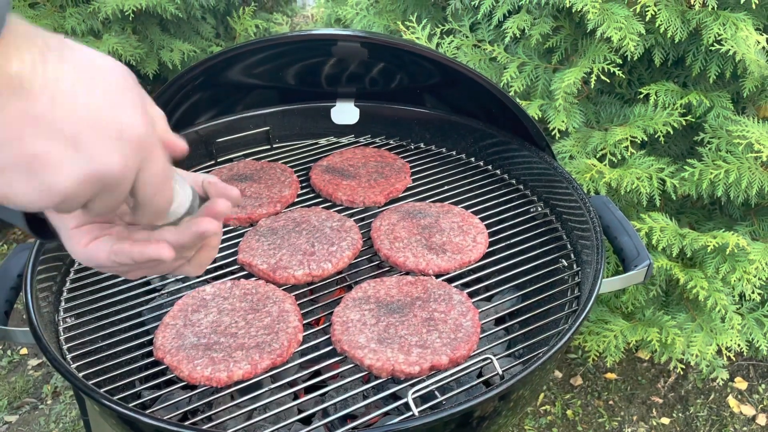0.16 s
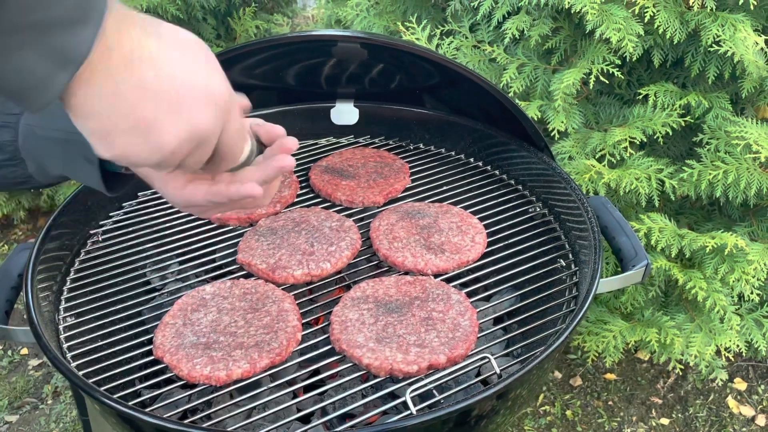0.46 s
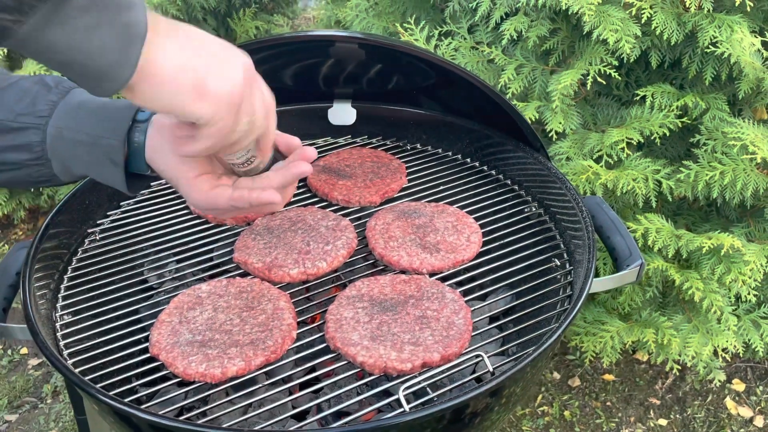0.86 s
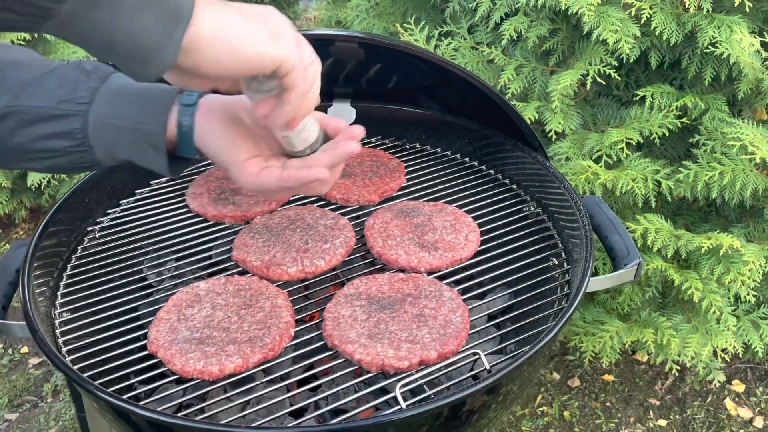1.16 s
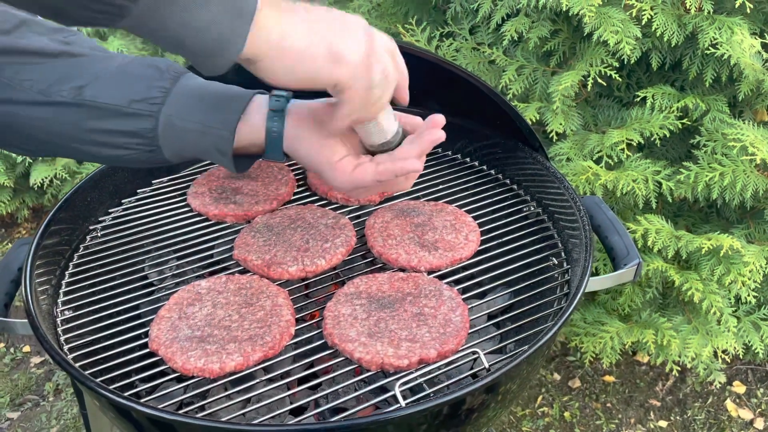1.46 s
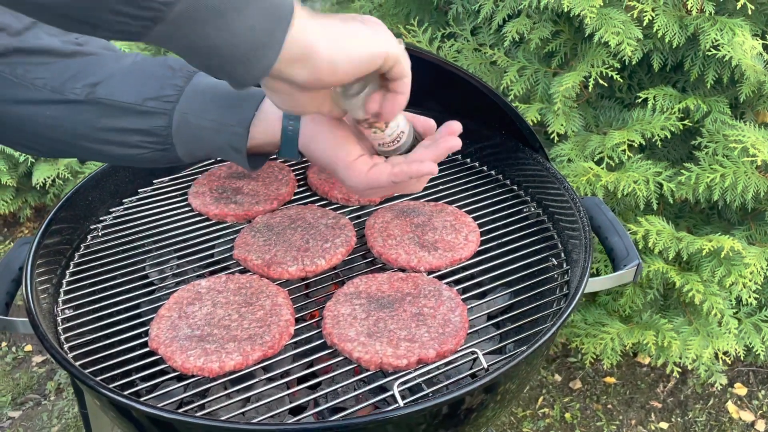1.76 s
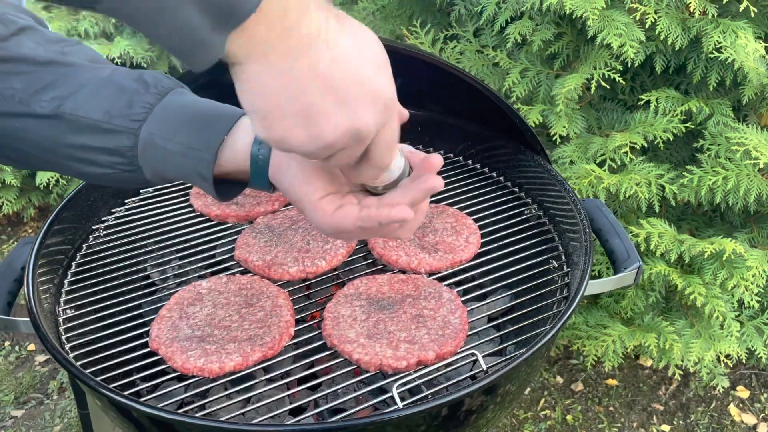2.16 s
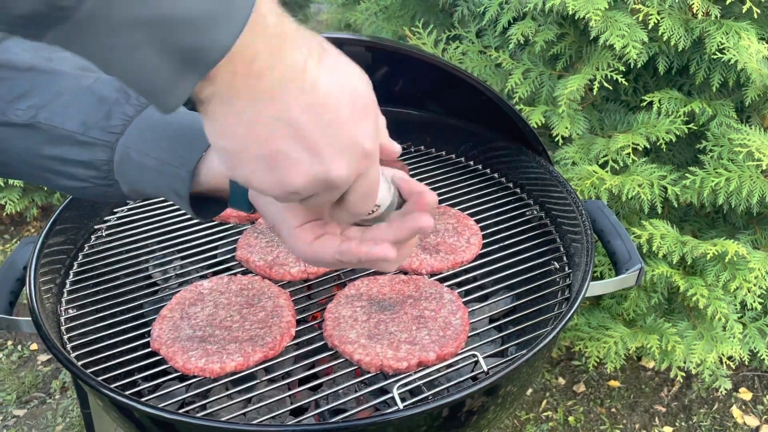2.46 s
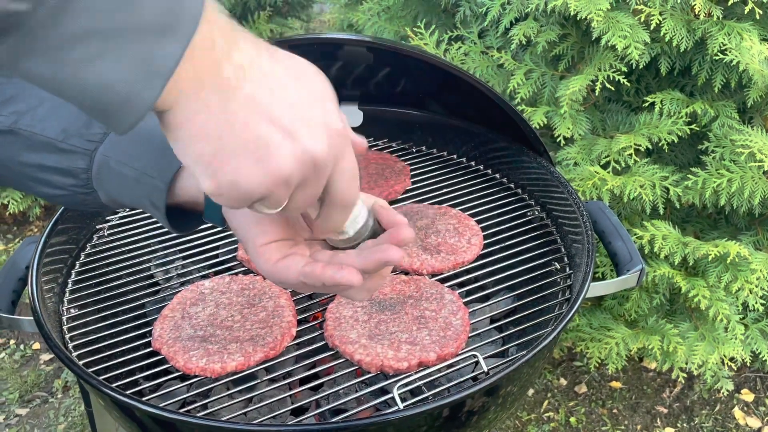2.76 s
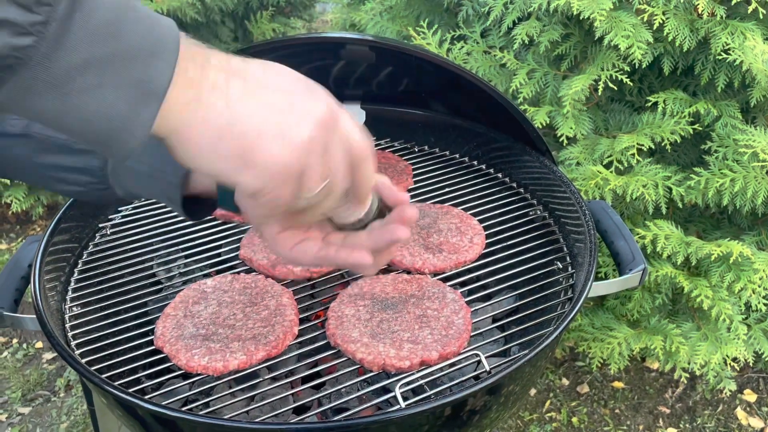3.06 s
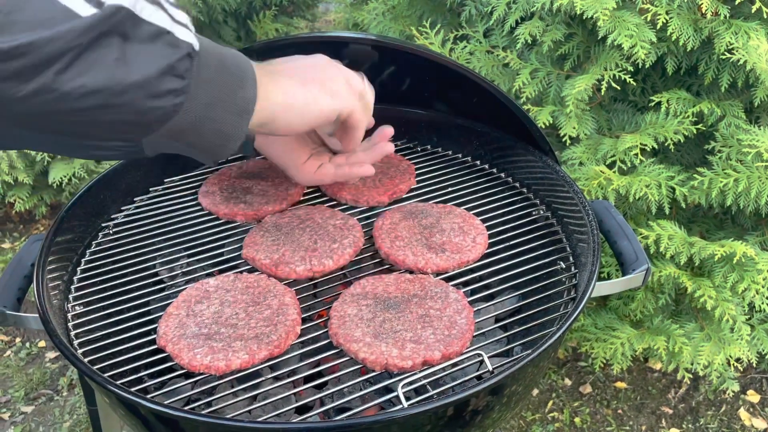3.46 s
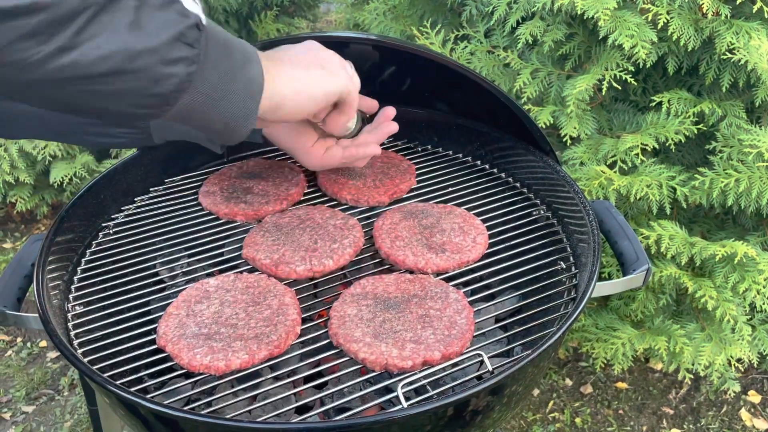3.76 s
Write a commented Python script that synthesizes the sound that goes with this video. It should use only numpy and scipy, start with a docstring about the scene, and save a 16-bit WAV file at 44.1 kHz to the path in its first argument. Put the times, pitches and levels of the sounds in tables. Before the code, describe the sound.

A small pepper mill is twisted by hand fourteen times, about every 0.3 seconds, each a brief dry crunch with sharp peppercorn snaps; outdoors over an open grill, close phone microphones, faint steady hiss beneath.

```python
"""Outdoors at an open kettle grill: a hand pepper mill is twisted fourteen times over it, close to a phone.
Each twist is a dense run of tiny grit fractures, and whole peppercorns snap as noise bursts around it;
both ring the mill's body and the cupped hands, and hard knocks add a low thud.
Hands and grill bowl scatter the sound to two microphones as decaying noise reflections.
A faint hiss and an outdoor rumble, both filtered noise, lie under it; the hardest snaps clip."""
import sys
import numpy as np
from scipy import signal
from scipy.fft import rfft, irfft
from scipy.io import wavfile
from scipy.ndimage import uniform_filter1d

SR = 44100
rng = np.random.default_rng(int(sys.argv[2]) if len(sys.argv) > 2 else 0)


def master_out(mix):
    """Clip the mix to full scale and print it as 16-bit PCM to the path in sys.argv[1]."""
    frames = np.transpose(np.atleast_2d(mix))
    ceiling = np.clip(frames, -1, 1)
    pcm = np.round(ceiling * 32767).astype(np.int16)
    wavfile.write(sys.argv[1], SR, pcm)


N = 171990

# Steady hiss around the grill. Each row: frequency in Hz, level in dB per Hz.
HISS = [(200, -10), (500, -17), (1400, -2.5), (2400, -0.5), (3300, -4.5), (5400, -4), (8000, -1),
        (13600, 5.5), (15700, 1)]
# Outdoor rumble. Each row: frequency in Hz, level in dB per Hz.
RUMBLE = [(28, -32.5), (52, 8), (70, -3), (250, -28.5)]
# Twists of the mill. Each row: start in seconds, end in seconds, crunch level in dB and
# low rasp level in dB (both before trim), resonance of the cupped hands in Hz.
TWISTS = [(0.123, 0.175, -17.5, -23.5, 560), (0.432, 0.489, -19.5, -23.5, 704),
          (0.713, 0.764, -13.5, -22.5, 222), (0.964, 1.032, -19.5, -24, 940),
          (1.281, 1.356, -21, -28, 1500), (1.575, 1.633, -20.5, -26.5, 1620),
          (1.822, 1.887, -21, -26, 1530), (2.122, 2.193, -16.5, -24, 1760), (2.395, 2.466, -18, -22, 644),
          (2.672, 2.706, -13.5, -24, 1400), (2.908, 2.973, -15.5, -27.5, 2300),
          (3.253, 3.333, -19, -28, 2400), (3.551, 3.629, -16, -27.5, 2180),
          (3.813, 3.867, -18.5, -24.5, 227)]
# Peppercorns that crack. Each row: start in seconds, snap level in dB, knock level in dB.
CRACKS = [(0.1285, -10, -24), (0.1425, -5, -11), (0.1519, -8, -17), (0.1649, -8, -21), (0.1875, -3, -7),
          (0.195, -10, -21), (0.4361, -7, -28), (0.4592, -7, -23), (0.4935, -11, -29), (0.709, -10, -26),
          (0.7145, -8, -26), (0.742, -3, -13), (0.7515, -5, -20), (0.7612, -7, -24), (0.9724, -9, -28),
          (0.9872, -6, -26), (1.0313, -8, -29), (1.0901, -20, -38), (1.2834, -5, -22), (1.5593, -16, -23),
          (1.5814, -5, -23), (1.5934, -6, -22), (1.607, -7, -18), (1.8096, -19, -34), (1.8403, -7, -24),
          (1.856, -7, -25), (2.002, -22, -40), (2.1004, -18, -37), (2.1222, -5, -18), (2.1302, -8, -17),
          (2.1383, -7, -14), (2.1744, -4, -15), (2.1921, -8, -23), (2.2463, -19, -42), (2.3782, -15, -20),
          (2.3949, -6, -25), (2.401, -5, -25), (2.4157, -3, -18), (2.431, -6, -16), (2.4638, -4, -21),
          (2.6324, -19, -43), (2.6609, -10, -25), (2.67, -7, -17), (2.675, -5, -25), (2.6935, -6, -21),
          (2.7245, -20, -20), (2.9024, -15, -31), (2.9168, -6, -22), (2.9258, -6, -29), (2.9445, -7, -18),
          (2.9724, -9, -25), (3.0418, -22, -41), (3.244, -10, -30), (3.2585, -4, -19), (3.3482, -9, -32),
          (3.536, -11, -23), (3.5553, -4, -20), (3.583, -3, -24), (3.597, -3, -25), (3.8165, -10, -24),
          (3.8858, -3, -21)]
# Low resonances of the jolted hands and mill. Each row: frequency in Hz, level in dB.
THUD = [(240, -11), (530, -3.5), (860, -2)]
# Colour of the breaking pepper. Each row: frequency in Hz, level in dB per Hz.
CRUNCH = [(1800, -32), (2900, -22), (4000, -7), (5300, -13), (6500, -5), (7900, 3.5), (11500, -6),
          (13400, 3), (15700, -9)]
# Colour of the mill's shell. Each row: frequency in Hz, level in dB per Hz.
SHELL = [(60, -36), (215, -3), (340, -15), (500, -11), (1000, -6), (1600, -2), (2400, 1.5), (2900, -8),
         (3700, -2.5), (5500, -26)]
# Ringing modes of the mill. Each row: frequency in Hz, 60 dB decay time in seconds, level in dB.
MODES = [(1570, 0.087, -18.5), (6450, 0.05, -21.5), (7060, 0.048, -24)]
# Colour of scattered sound. Each row: frequency in Hz, level in dB.
SCATTER = [(400, -6), (5500, 3), (8600, -5), (11300, 2), (13200, -11)]
# Phase lead of the left microphone over the right. Each row: frequency in Hz, lead in radians.
PORT_PHASE = [(1500, .4), (2300, 1.5), (3600, 5.8), (5200, 7), (6200, 4.9), (6700, 5), (7500, 3.6),
              (10000, 2.5), (12600, 0)]
# Level balance of the microphones. Each row: frequency in Hz, left minus right in dB.
PORT_BALANCE = [(800, 4), (2300, -3), (3200, 1), (6500, 3), (7700, 0)]

HISS_DB, RUMBLE_DB = -33.5, -50.5
HISS_WAVER_DB, RUMBLE_WAVER_DB, WAVER_PER_S = 0.6, 2.2, 7
RUMBLE_OWN_SHARE = 0.79  # noise of each side's own, relative to the common noise

TWIST_ATTACK_S, TWIST_RELEASE_S = 0.0016, 0.0045
TWIST_START_DB = -0.5  # each twist starts this much down and swells to its full level
SCRAPE_S, SCRAPE_DB = 0.014, -11.5  # light scraping before the burrs bite and after they let go
CRUNCH_TRIM_DB, RASP_TRIM_DB = -0.3, -1
CLUMP_PER_S, CLUMP_DB = 220, 1.5  # random unevenness of the grinding
GRIT_PER_S, GRIT_SPREAD_DB, GRIT_CYCLES = 2200, 3.2, 1.3
CHIP_LOW_HZ, CHIP_HIGH_HZ = 3580, 14140  # range in which the fragments ring

CRACK_S = 0.007  # length of a crack at full force, before its fall
SNAP_RISE_S, SNAP_FALL_S, KNOCK_FALL_S = 0.00015, 0.0009, 0.0018
THUD_T60_S = 0.035
HOLLOW_REF_HZ, HOLLOW_DB, HOLLOW_Q = 500, 1.5, 2.2  # the level holds at the reference pitch

SCATTER_T60_S, SCATTER_DB = 0.009, -5
BOWL_T60_S, BOWL_DB = 0.07, -17
CLIP_LEVEL, TOP_HZ = 1.0, 15750


def undb(db):
    """Decibels to gain."""
    return 10 ** (np.asarray(db) / 20)


def unit(x):
    """Scale to an rms of one."""
    return x / np.sqrt(np.mean(x ** 2) + 1e-18)


def curve(points, size):
    """Read (Hz, value) points at the bins of a transform, straight lines over log frequency."""
    hz, value = np.array(points, float).T
    bins_hz = np.fft.rfftfreq(size, 1 / SR) + 1  # the 1 avoids log(0)
    return np.interp(np.log(bins_hz), np.log(hz), value)


def through(x, response):
    """Pass a sound through an impulse response scaled to unit energy."""
    energy = np.sum(response ** 2)
    return signal.fftconvolve(x, response / np.sqrt(energy))[:N]


def colour(x, points, size=4096):
    """Shape the spectrum with a causal, minimum-phase filter of unit energy."""
    cepstrum = irfft(np.log(undb(curve(points, size))))
    # folding the cepstrum onto positive times makes the filter minimum phase
    cepstrum[1:size // 2] *= 2
    cepstrum[size // 2 + 1:] = 0
    return through(x, irfft(np.exp(rfft(cepstrum))))


def fade(t60):
    """Times and envelope of a decay by 60 dB."""
    t = np.arange(int(t60 * SR) + 2) / SR
    return t, 1000 ** (-t / t60)


def gate(t, length, rise, fall):
    """Linear attack, hold until the given length, exponential release."""
    attack = np.clip(t / rise, 0, 1)
    release = np.exp(-np.maximum(t - length, 0) / fall)
    return attack * release


def add(out, start, sound):
    """Mix a sound in at a time in seconds."""
    i = max(int(start * SR), 0)
    out[i:i + len(sound)] += sound[:max(N - i, 0)]


def walk(per_s):
    """Smooth random wander with an rms of one: held random steps, averaged over a step's length."""
    hold = max(int(SR / per_s), 1)
    steps = rng.standard_normal(N)[np.arange(N) // hold]
    return unit(uniform_filter1d(steps, hold))


def ports(x):
    """Direct sound reaches the two microphones with different phase and level, split evenly between them."""
    half = undb(curve(PORT_BALANCE, N) / 2) * np.exp(0.5j * curve(PORT_PHASE, N))
    spectrum = rfft(x)
    return np.array([irfft(spectrum * half, N), irfft(spectrum / half, N)])


def hiss():
    """Slightly wavering noise, partly from the direction of the mill and partly from all around."""
    ahead, left, right = (colour(rng.standard_normal(N), HISS) for _ in range(3))
    around = undb(SCATTER_DB) * np.array([colour(left, SCATTER), colour(right, SCATTER)])
    level = undb(HISS_DB + HISS_WAVER_DB * walk(WAVER_PER_S))
    return level * (ports(ahead) + around)


def rumble():
    """Uneven low noise, mostly alike at both microphones because they share a common part."""
    common = rng.standard_normal(N)
    level = undb(RUMBLE_DB + RUMBLE_WAVER_DB * walk(WAVER_PER_S))
    sides = []
    for _ in range(2):
        own = RUMBLE_OWN_SHARE * rng.standard_normal(N)
        sides.append(unit(colour(common + own, RUMBLE)))
    return level * np.array(sides)


def grains(size=96, count=16000):
    """Tiny fractures at random moments ring a few cycles, each at its own pitch; a few are much stronger."""
    draws = rng.random((count, 4))[:int(GRIT_PER_S * N / SR)]
    when, pitch, strength, phase = draws.T[:, :, None]
    hz = CHIP_LOW_HZ + pitch * (CHIP_HIGH_HZ - CHIP_LOW_HZ)
    cycles = hz * np.arange(size) / SR
    # exponential spread in dB, capped at four times the spread
    gain = undb(-GRIT_SPREAD_DB * np.log(np.maximum(strength, np.exp(-4))))
    waves = gain * np.exp(-cycles / GRIT_CYCLES) * np.sin(2 * np.pi * (cycles + phase))
    where = (when * N).astype(int) + np.arange(size)
    chips = np.bincount(where.ravel(), waves.ravel(), N)[:N]
    # each fracture also pushes the shell with one click of either sign
    pushes = np.bincount(where[:, 0], (gain * np.sign(phase - 0.5))[:, 0], N)
    return unit(chips), unit(pushes)


def grinding():
    """Grit breaks between the burrs while the hand turns: bright crunch and pushes on the shell."""
    t = np.arange(N) / SR
    chips, pushes = grains()
    crunch, rasp = np.zeros((2, N))
    for start, end, crunch_db, rasp_db, _ in TWISTS:
        bite = gate(t - start, end - start, TWIST_ATTACK_S, TWIST_RELEASE_S)
        scrape = gate(t - start + SCRAPE_S, end - start + 2 * SCRAPE_S, SCRAPE_S, TWIST_RELEASE_S)
        progress = np.clip((t - start) / (end - start), 0, 1)
        swell = undb(TWIST_START_DB * (1 - progress))
        effort = swell * np.maximum(bite, undb(SCRAPE_DB) * scrape)
        crunch += effort * undb(crunch_db + CRUNCH_TRIM_DB)
        rasp += effort * undb(rasp_db + RASP_TRIM_DB)
    clumps = unit(undb(CLUMP_DB * walk(CLUMP_PER_S)))
    return np.array([crunch * chips, rasp * pushes]) * clumps


def cracking(size=4096):
    """A peppercorn snaps and knocks the shell; hard knocks last longer and jolt the hands into a thud."""
    t = np.arange(size) / SR
    tones = sum(undb(db) * np.cos(2 * np.pi * hz * t) for hz, db in THUD)
    thud = tones * 1000 ** (-t / THUD_T60_S)
    snaps, knocks, thuds = np.zeros((3, N))
    for start, snap_db, knock_db in CRACKS:
        tear, slip = rng.standard_normal((2, size))
        force = undb(knock_db)
        length = CRACK_S * np.sqrt(force)
        add(snaps, start, undb(snap_db) * tear * gate(t, length, SNAP_RISE_S, SNAP_FALL_S))
        add(knocks, start, force * slip * gate(t, length, SNAP_RISE_S, KNOCK_FALL_S))
        add(thuds, start, force ** 2 * thud)  # the thud grows faster than the knock
    return snaps, knocks, thuds


def grips():
    """Sample ranges, one per twist; the hands shift midway between twists."""
    shifts = [int(SR * (before[1] + after[0]) / 2) for before, after in zip(TWISTS, TWISTS[1:])]
    return list(zip([0] + shifts, shifts + [N]))


def hollow(x):
    """The cupped hands resonate at a new pitch with each grip; a smaller, higher hollow is weaker."""
    resonance = np.zeros(N)
    for (first, last), (*_, hz) in zip(grips(), TWISTS):
        b, a = signal.iirpeak(hz, HOLLOW_Q, fs=SR)
        weight = np.sqrt(HOLLOW_REF_HZ / hz)
        resonance[first:last] = weight * signal.lfilter(b, a, x[first:last])
    return x + undb(HOLLOW_DB) * resonance


def mill():
    """Grinding and cracks sound directly, through the cupped hands, and in the body's decaying modes."""
    snaps, knocks, thuds = cracking()
    crunch, rasp = grinding()
    bright, low = crunch + snaps, rasp + knocks
    out = colour(bright, CRUNCH) + hollow(colour(low, SHELL)) + thuds
    for hz, t60, db in MODES:
        t, decay = fade(t60)
        drive = low if hz < CHIP_LOW_HZ else bright
        out = out + undb(db) * through(drive, decay * np.cos(2 * np.pi * hz * t))
    return out


def reflections(x, t60, size=8192):
    """Dense, quickly fading reflections, different at each microphone and with each new grip."""
    decay = fade(t60)[1][:size]
    out = np.zeros((2, N))
    for first, last in grips():
        for side in out:
            echoes = decay * rng.standard_normal(len(decay))
            add(side, first / SR, through(x[first:last], echoes))
    return out


def scene():
    """The mill, scattered by the hands and the grill bowl, over hiss and rumble."""
    near = mill()
    scattered = colour(near, SCATTER)
    hands = undb(SCATTER_DB) * reflections(scattered, SCATTER_T60_S)
    bowl = undb(BOWL_DB) * reflections(scattered, BOWL_T60_S)
    return ports(near) + hands + bowl + hiss() + rumble()


def record(dry):
    """The phone clips the hardest snaps, then a steep low-pass cuts the top."""
    clipped = np.clip(dry, -CLIP_LEVEL, CLIP_LEVEL)
    low_pass = signal.ellip(10, 0.1, 70, TOP_HZ, fs=SR, output="sos")
    return signal.sosfilt(low_pass, clipped)


dry = scene()
out = record(dry)
master_out(out)
```